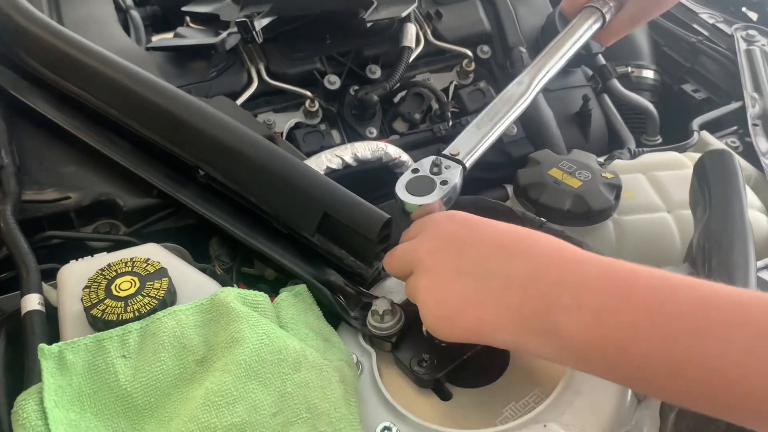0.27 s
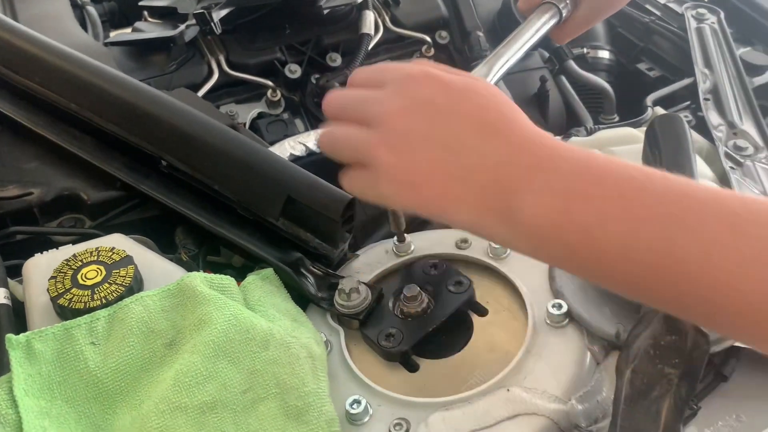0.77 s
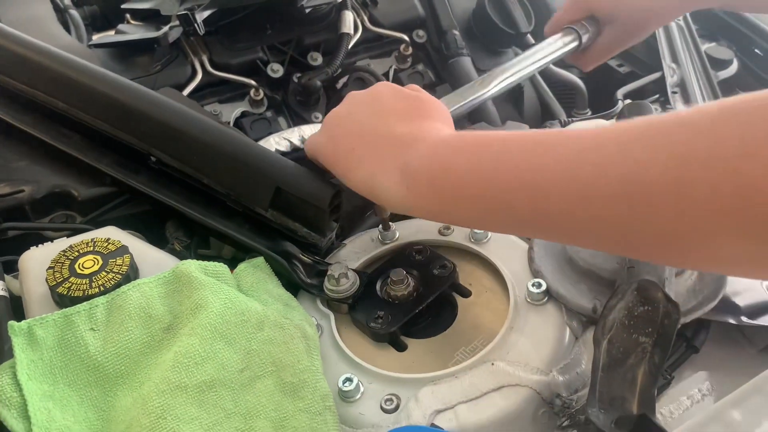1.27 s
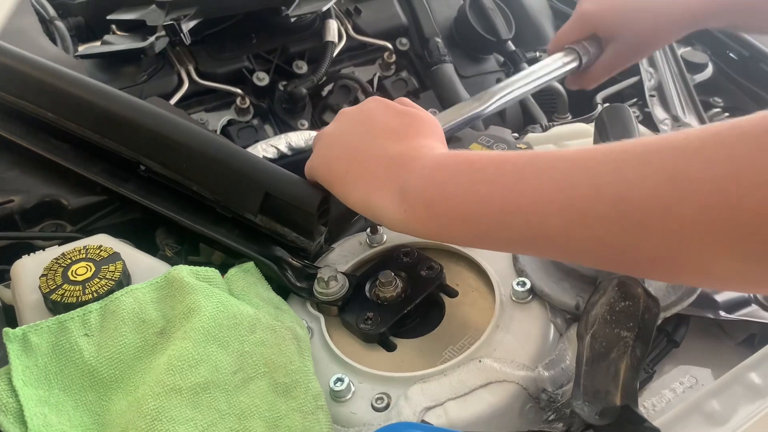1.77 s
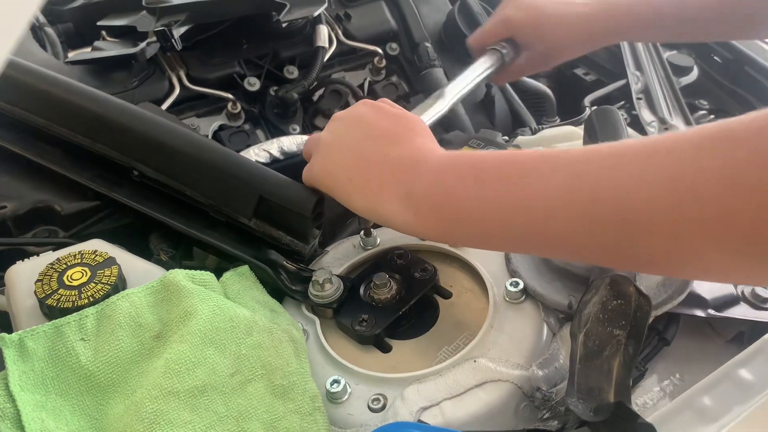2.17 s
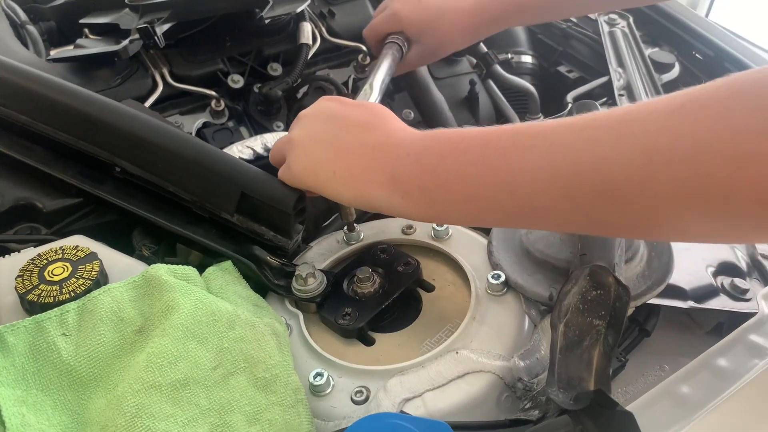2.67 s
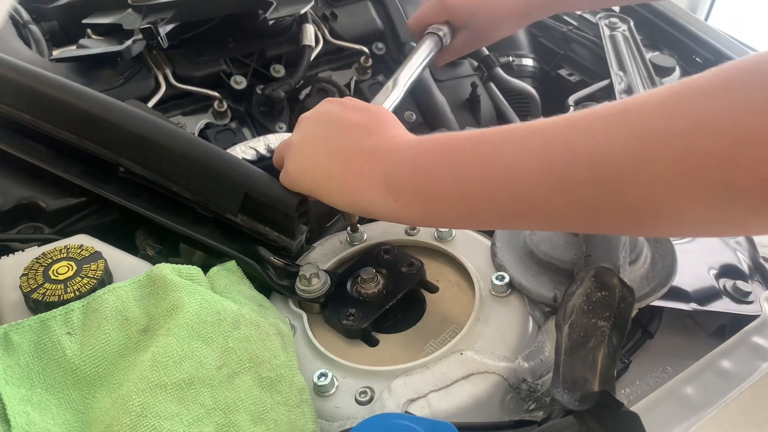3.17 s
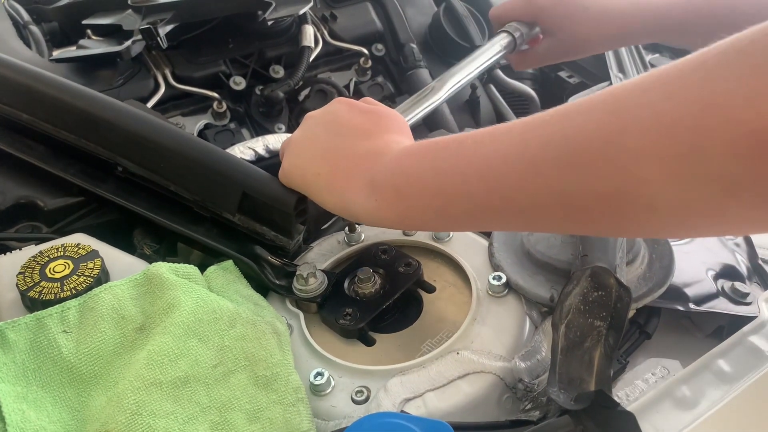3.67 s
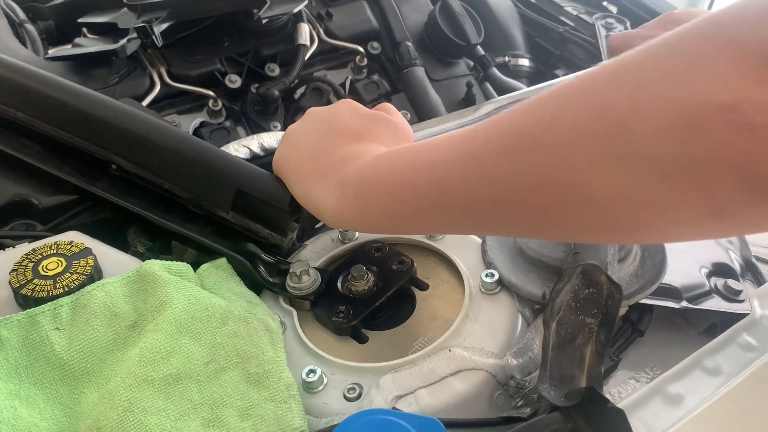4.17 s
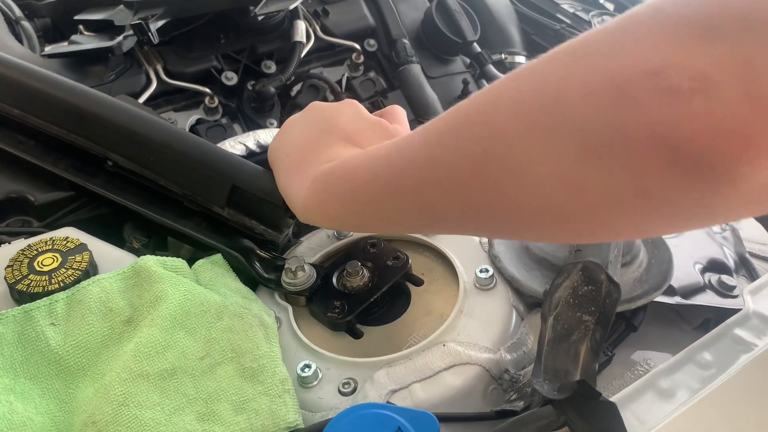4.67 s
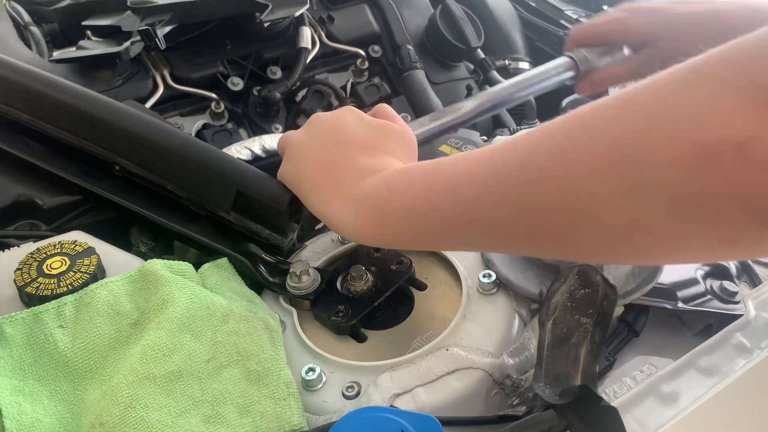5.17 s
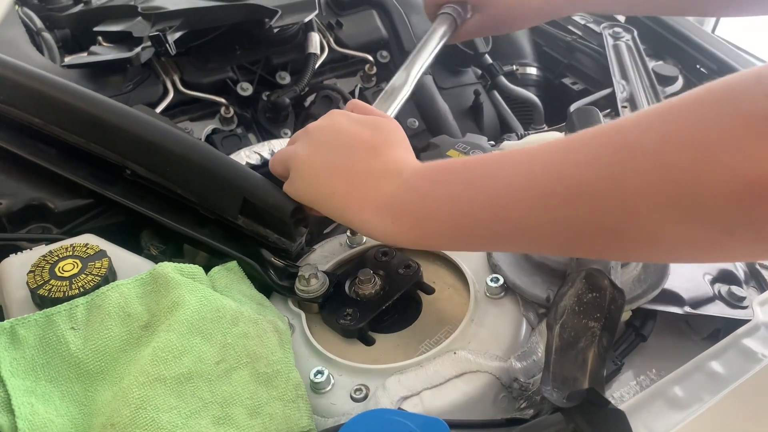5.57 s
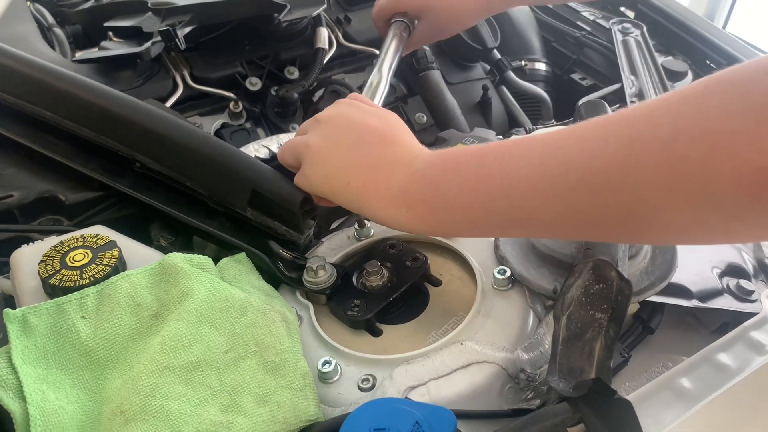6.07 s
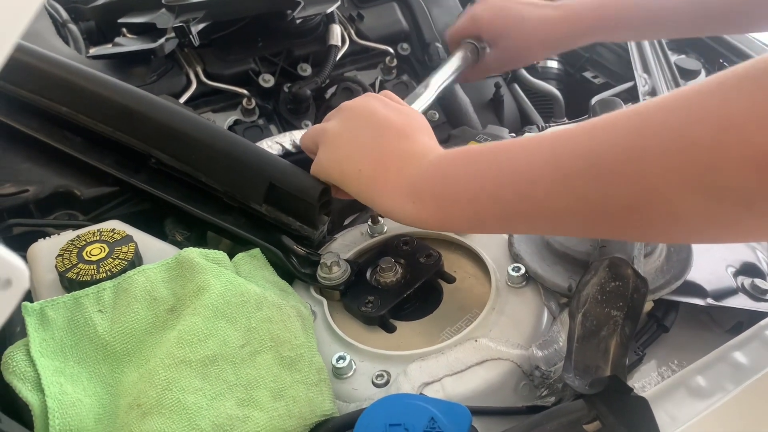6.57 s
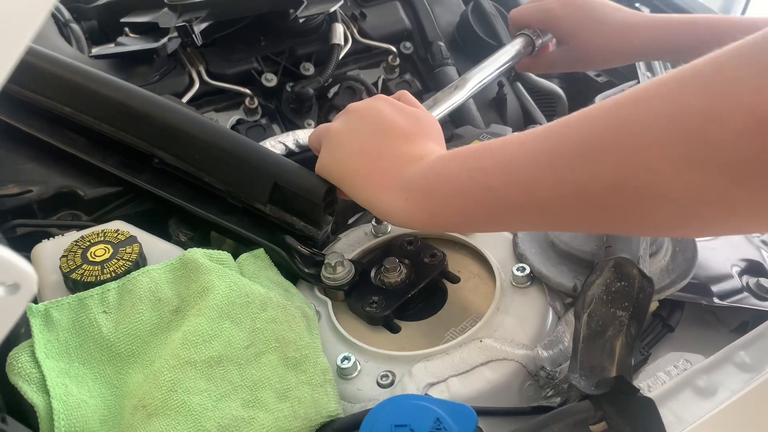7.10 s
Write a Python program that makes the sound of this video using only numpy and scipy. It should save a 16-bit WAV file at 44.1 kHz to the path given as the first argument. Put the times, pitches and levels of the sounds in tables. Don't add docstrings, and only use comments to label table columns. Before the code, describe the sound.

A ratcheting wrench tightens a nut within arm's reach of the microphone. A weaker click and hollow metal bumps open it, then small ticks and a clattering knock, two groups of hard bright snaps, a lull with soft low body creaks and a faint scrape, and another run of snaps with a slight steely ring. Short reflections come off the engine parts; low road wash stays quiet behind and thins near the end.

```python
import sys
import numpy as np
from scipy import signal
from scipy.fft import rfft, irfft
from scipy.io import wavfile

SR = 44100
rng = np.random.default_rng(int(sys.argv[2]) if len(sys.argv) > 2 else 0)


def gain_from_decibels(decibels):
    exponent = np.asarray(decibels, float) / 20
    return 10 ** exponent


def output_pcm(signal):
    pcm = np.clip(np.atleast_2d(signal).T, -1, 1) * 32767
    wavfile.write(sys.argv[1], SR, np.round(pcm).astype(np.int16))


N = 323463
EDGES_HZ = 22 * 2 ** np.arange(0, 9.6, .5)


def rms_one(x):
    return x / np.sqrt(np.mean(x ** 2) + 1e-20)


def peak_one(x):
    return x / np.abs(x).max()


def in_time(rows):
    s, *columns = np.transpose(rows)
    return [np.interp(np.arange(N) / SR, s, c) for c in columns]


def at_hz(points, hz, axis=1):
    points = np.array(points)
    return np.interp(np.log(hz), np.log(points[:, 0]), points[:, axis])


def band(x, low_hz, high_hz):
    edges = [low_hz, min(high_hz, SR * .45)]
    return signal.sosfilt(signal.butter(2, edges, "band", fs=SR, output="sos"), x)


def steep(x, hz, kind, order):
    return signal.sosfilt(signal.butter(order, hz, kind, fs=SR, output="sos"), x)


def drift(rate):
    r = np.exp(-80 * np.pi * rate / SR)
    noise = rng.standard_normal(N // 40 + 2002)
    slow = signal.lfilter([1], [1, -2 * r, r * r], noise)[2000:]
    return np.interp(np.arange(N) / 40, np.arange(len(slow)), rms_one(slow))


def ring(clicks, hz, t60):
    r, w = gain_from_decibels(-60 / (t60 * SR)), 2 * np.pi * hz / SR
    return signal.lfilter([0, np.sin(w)], [1, -2 * r * np.cos(w), r * r], clicks)


def dying(seconds, t60, rise):
    t = np.arange(round(seconds * SR)) / SR
    return (1 - np.exp(-t / rise)) * gain_from_decibels(-60 * t / t60)


def add(out, s, piece):
    i = round(s * SR)
    out[..., i:i + piece.shape[-1]] += piece[..., :N - i]


def strokes(rows):
    t, total = np.arange(N) / SR, 0
    for s, rise, hold, fall, db in rows:
        away = np.maximum((s - t) / rise, (t - s - hold) / fall)
        total = total + gain_from_decibels(db - 29.5 * np.clip(away, 0, 2))
    return total


# f/Hz, likeness [0-1]
LIKENESS = [(60, 0.94), (130, 0.99), (290, .7), (640, .3), (1400, 0.1), (3100, 0.038), (7000, 0.15)]


def pair(mid, side, hz):
    alike = np.clip(at_hz(LIKENESS, hz), 0, 1)
    return np.sqrt(1 + alike) * mid + np.sqrt(1 - alike) * side * [[1], [-1]]


# f/Hz, level/dB [per Hz]
OUTDOORS = [(25, -12), (50, -2), (74, -7.5), (110, -8), (240, -18.5), (420, -19.5), (700, -19.5),
            (1100, -22.5), (1740, -28), (2300, -40.5), (3000, -57), (6000, -60.5), (10000, -58),
            (14000, -61.5)]
# t/s, level/dB
TRAFFIC = [(0.0, -57.5), (0.24, -58), (0.65, -64.5), (1.37, -60), (1.59, -61), (1.98, -62), (2.78, -64.5),
           (3.86, -64.5), (3.94, -62), (4.33, -62), (4.57, -59), (5.08, -61), (6.25, -75.5), (6.76, -70),
           (7.02, -75), (7.33, -74.5)]
# t/s, level/dB
ENGINE = [(0, -55), (.9, -56), (2.0, -55.5), (3.0, -62), (3.9, -57), (4.3, -51.5), (4.47, -56),
          (4.65, -52.5), (5.37, -45.5), (5.65, -57.5), (5.85, -55.5), (6.08, -47), (6.24, -65),
          (6.66, -48.5), (6.76, -58.5), (6.9, -54.5), (7.06, -68), (7.33, -63.5)]
# t/s, level/dB
LORRY = [(0, -66.5), (.7, -60.5), (1.3, -58), (2.1, -60.5), (3.0, -58), (4.0, -63.5), (5.0, -67),
         (6.3, -62), (7.33, -72.5)]


def road():
    (near_db,), (engine_db,), (rumble_db,) = in_time(TRAFFIC), in_time(ENGINE), in_time(LORRY)
    near_db = near_db - near_db.mean()
    drone_db = -60 + .8 * near_db + 1.5 * drift(2.7)
    wash_db = -66.5 + 0.96 * near_db
    white, ranges, together = rng.standard_normal((2, 2, N)), np.zeros((4, 2, N)), drift(4.5)
    for k, (low, high) in enumerate(zip(EDGES_HZ, EDGES_HZ[1:])):
        mid, side = band(white[k % 2], low, high)
        hz = np.sqrt(low * high)
        patchy_db = .8 if hz < 2500 else .2
        gain = gain_from_decibels(at_hz(OUTDOORS, hz) + patchy_db * (together + drift(1.6)))
        ranges[np.searchsorted([90, 300, 2600], hz)] += gain * pair(mid, side, hz)
    ranges[0] = steep(ranges[0], 36, "high", order=4)
    ranges[3] = steep(ranges[3], 14300, "low", order=16)
    levels_db = rumble_db + 4.0, drone_db, wash_db, -82.25
    stream = sum(gain_from_decibels(db) * rms_one(r) for db, r in zip(levels_db, ranges))

    tyre_hz, tyre_t60_s = 1065, .022
    tyres = pair(*ring(rng.standard_normal((2, N)), tyre_hz, tyre_t60_s), tyre_hz)
    far = gain_from_decibels(-69 + .3 * near_db + 2.1 * drift(5.3)) * rms_one(tyres)
    steady = steep(ranges[2, ::-1, ::-1], 680, "high", order=2)
    far += gain_from_decibels(-73) * rms_one(steady)

    engine_hz = 74.45
    beat = np.sin(2 * np.pi * np.cumsum(engine_hz + 1.583 * drift(1.2)) / SR)
    hum = ring(rng.standard_normal((2, N)), engine_hz, 0.3)
    hum = rms_one(hum[0] + 0.3 * hum[1] * [[1], [-1]])
    hum = rms_one(1.4 * beat + hum)
    return stream + gain_from_decibels(engine_db - 1.5) * hum + far


# t/s, peak level/dB, weight under 2.8 kHz/dB, body 2.8-5.5 kHz/dB, brightness over 9 kHz/dB
PAWL = [(0.119, -33, -16, -11, -11.5), (2.1748, -27, -23.5, -11, -4), (2.1826, -19, -18.5, -18.5, -7.5),
        (2.4824, -31.5, -17.5, -21, -8.5), (2.5098, -18.5, -6, -18.5, -3.5), (5.1825, -50, -19.5, -26, 0),
        (5.3406, -28.5, -10, -15.5, -3.5), (5.3479, -18.5, -8.5, -14.5, -3), (5.5553, -29, -12, -4.5, 0),
        (5.57, -20.5, -11.5, -18.5, -4.5), (5.8679, -32.5, -7, -12, -1.5),
        (5.9001, -22.5, -12.5, -19, -9.5)]
# f/Hz, level/dB, t60/s
WRENCH = [(2000, -13, 0.017), (2888, -6, 0.065), (3600, -5.5, 0.076), (3673, -3, .09), (3860, -6, .08),
          (4140, -10, 0.045), (4690, -8.5, 0.063), (5110, -11, 0.083), (5820, -3.5, 0.043),
          (6000, -5.5, 0.071), (6160, -8, 0.096), (6625, -2.5, 0.082), (7370, -14.5, 0.076),
          (7560, -6.5, 0.074), (8350, -0.5, 0.12), (8600, -2.5, 0.1), (9060, -4.5, 0.032),
          (11100, -12, 0.02), (12730, -5, .05), (13470, -2, 0.039), (13860, -13.5, 0.023)]
# f/Hz, level/dB [per Hz]
CRACK = [(700, -35.5), (1100, -9), (1700, -7.5), (2400, -4.5), (3500, -1.5), (5000, 4), (6400, 1),
         (8700, -1.5), (12500, 3), (16400, -1.5)]
# f/Hz, level/dB
SHADE = [(300, -1.5), (1500, -3), (4000, 3), (4800, -4.5), (6500, -12.5), (7600, -20), (9000, 5.5)]


def pawl():
    out, feed = np.zeros((2, N)), np.zeros(N)
    length = 4400
    snap = dying(length / SR, .010, .00015)
    blow = np.eye(1, length)[0]
    for s, db, weight_db, body_db, bright_db in PAWL:
        colour = [(1300, weight_db + 14.5), (2300, weight_db + 13.5), (4200, body_db + 13.0),
                  (6800, 0), (10500, bright_db + 9.5), (13500, 1.7 * bright_db + 11)]
        chatter = rng.standard_normal((3, length)) * gain_from_decibels(2 * rng.standard_normal(length))
        rattle_db = np.interp(db, [-32, -22], [-10, -12])
        hit, sent = np.zeros((2, length)), np.zeros(length)
        for k, (low, high) in enumerate(zip(EDGES_HZ[10:], EDGES_HZ[11:])):
            hz = np.sqrt(low * high)
            own = np.interp(np.log2(hz / 5000), [-1.4, -.4, 1.1], [.6, 1.6, 1.2])
            sides = (chatter[0] + own * chatter[1:]) / np.hypot(1, own)
            sides = sides * gain_from_decibels(at_hz(SHADE, hz) / 2 * np.array([[1], [-1]]))
            rattle = gain_from_decibels(rattle_db) * dying(length / SR, .06 * min(1, (7000 / hz) ** .6), .001)
            click = 2.0 * np.roll(blow, 12) * [[(-1) ** (k // 2)], [1]]
            gain = (-1) ** k * gain_from_decibels(at_hz(CRACK, hz) + at_hz(colour, hz))
            hit += gain * band(sides * (snap + rattle) + click, low, high)
            sent += gain * band(blow, low, high)
        rings = np.zeros((2, length))
        for hz, mode_db, t60 in WRENCH:
            own_db = rng.normal(0, 1.6, (2, 1))
            rings += gain_from_decibels(mode_db + at_hz(colour, hz) + own_db) * ring(blow, hz, t60)
        hit = gain_from_decibels(db + 8.5) * peak_one(peak_one(hit) + gain_from_decibels(-8.0) * peak_one(rings))
        add(out, s, hit)
        echo_db = 1.5 + 0.17 * bright_db
        add(feed, s, gain_from_decibels(echo_db) * (rms_one(sent) + 0.41 * rms_one(rings[0])) * hit.std())
    return out, steep(feed, 14600, "low", order=16)


# f/Hz, t60/s, level/dB
BAY = [(300, 0.11, 2.5), (1010, 0.12, 6.5), (2503, 0.27, -2.5), (5000, 0.3, -1), (9000, 0.26, -6.5),
       (14000, 0.12, -12)]


def bay(x):
    white, echoes = rng.standard_normal((2, 2, 22000)), 0
    for k, (low, high) in enumerate(zip(EDGES_HZ[4:], EDGES_HZ[5:])):
        hz = np.sqrt(low * high)
        fall = dying(22000 / SR, at_hz(BAY, hz), 0.0014)
        echoes = echoes + gain_from_decibels(at_hz(BAY, hz, axis=2)) * pair(*band(white[k % 2], low, high), hz) * fall
    echoes = echoes / np.sqrt(np.sum(echoes ** 2) / 2)
    return signal.fftconvolve(x[None], echoes, axes=1)[:, :N]


# t/s, panel level/dB, crack level/dB, push length/s, most moved part f/Hz
KNOCKS = [(0.124, -32.5, -59, 0.018, 190), (0.131, -34, -72, 0.0075, 620), (0.164, -41.5, -71, 0.032, 620),
          (0.296, -36.5, -45.5, 0.028, 190), (0.284, -39, -51, 0.011, 596), (0.306, -36, -39, 0.011, 1260),
          (0.314, -30.5, -46, 0.01, 587), (1.326, -40, -34.5, 0.017, 900), (1.345, -31.5, -34, 0.0093, 596),
          (1.356, -33, -70, 0.047, 175), (1.819, -43.5, -54.5, 0.017, 390), (2.76, -48.5, -79, 0.023, 200),
          (5.357, -42.5, -59, 0.026, 340), (5.57, -46.5, -66, 0.035, 550), (5.902, -44, -46, 0.041, 400),
          (6.590, -42.5, -42.5, 0.0076, 260), (6.601, -45.5, -76.5, 0.022, 390)]
# f/Hz, level/dB, t60/s
PANEL = [(144, -14.5, 0.29), (196.5, 0, 0.15), (247, -7.5, 0.13), (280, -10, 0.1), (390, -9, 0.17),
         (471, -16.5, 0.17), (555, -8, 0.06), (596.4, -0.5, 0.036), (750, -8.5, .07), (841, -9, 0.025),
         (1000, -11.5, 0.1), (1350, -11.5, 0.099), (1570, -25.5, 0.15), (1750, -39.5, 0.02),
         (2390, -12, 0.066), (2620, -22.5, .03), (3090, -22, .03)]


def tower():
    out, length_s, crack_hz = np.zeros(N), 17600 / SR, 1450
    for s, panel_db, crack_db, push, part_hz in KNOCKS:
        noise = rng.standard_normal((2, 17600))
        shove = noise[0] * dying(length_s, 4 * push, push / 3)
        boom = 0
        for hz, db, t60 in PANEL:
            reach_db = -8 * abs(np.log2(hz / part_hz))
            boom = boom + gain_from_decibels(db + rng.normal(0, 1.5) + reach_db) * ring(shove, hz, t60)
        dull = noise[1] * dying(length_s, 5.3 * push, 0.00023)
        bright = noise[1] * dying(length_s, 0.97 * push, 0.00028)
        crack = band(dull, crack_hz / 2, crack_hz * 1.27)
        crack += gain_from_decibels(-17.0) * band(bright, crack_hz * 0.81, 9700)
        add(out, s, gain_from_decibels(panel_db) * peak_one(boom) + gain_from_decibels(crack_db) * peak_one(crack))
    return out


# t/s, peak level/dB, f/Hz,
# width/octaves
TICKS = [(.27, -58, 2600, 0.34), (0.308, -36, 3080, 2.4), (0.412, -49, 2300, 1.3), (.41, -57, 4860, 0.57),
         (0.412, -49, 9000, 1.1), (.671, -51.5, 5170, 1.45), (.95, -57, 4400, 1.9), (1.026, -59, 7350, 1.2),
         (1.075, -62, 3500, 0.38), (1.319, -49.5, 2280, 1.7), (1.327, -32, 2760, 0.63),
         (1.342, -41, 3670, 1.2), (1.545, -65, 4600, 0.78), (1.556, -60.5, 3980, 0.58),
         (1.765, -63, 2560, 0.36), (2.059, -63, 6000, 0.57), (4.55, -63, 4040, 0.46),
         (4.606, -49, 1750, 0.65), (5.116, -41, 1350, .8), (5.129, -62, 3600, 0.36),
         (5.131, -59, 7180, 0.5), (2.481, -29, 6750, .3), (5.867, -32.5, 6370, .25),
         (5.903, -33, 6400, .35), (5.57, -19, 13500, .2), (5.9007, -23.5, 13500, .2), (6.11, -65, 7540, .5),
         (6.131, -62.5, 7830, 0.33), (6.588, -54, 3600, 0.95), (7.274, -70, 4180, 0.69)]


def ticks():
    out = np.zeros(N)
    for s, db, hz, octaves in TICKS:
        touch = rng.standard_normal(2200) * dying(2200 / SR, 0.021, 0.00075)
        touch[3] += 6
        low, high = hz / 2 ** (octaves / 2), hz * 2 ** (octaves / 2)
        add(out, s, gain_from_decibels(db) * peak_one(band(band(touch, low, high), low, high)))
    return out


# full weight t/s, build-up/s, hold/s, let-go/s, level/dB
LEANS = [
    (4.4, 0.38, 0.64, 0.48, -61.5),
    (0.83, 0.26, 0.14, 0.11, -65),
    (2.4, 0.13, 0.085, 0.15, -61.5),
    (6.42, .1, 0.053, 0.084, -66.5),
]


def lean():
    nudges = (rng.random(N) < 170 / SR) * rng.standard_normal(N)
    dealt = rng.integers(0, 5, N)
    mutter = 0
    for k, (hz, db, t60) in enumerate(PANEL[1:6]):
        own = nudges * (dealt == k) + 1e-18
        mutter = mutter + gain_from_decibels(.5 * db) * ring(own, hz, .4 * t60)
    return strokes(LEANS) * rms_one(steep(mutter, 400, "low", order=2))


# full strength t/s, build-up/s, hold/s, let-go/s, level/dB
DRAGS = [
    (2.172, 0.13, .002, .01, -64),
    (2.478, .04, 0.0016, .01, -70),
    (5.336, 0.055, .002, .01, -71.5),
    (5.552, 0.031, 0.0024, 0.013, -73),
    (5.865, 0.027, .002, .01, -72.5),
]
# full strength t/s, build-up/s, hold/s, let-go/s, level/dB
RUBS = [
    (4.5, .05, .05, 0.034, -84.5),
    (4.877, .06, .2, .07, -79.5),
]
# f/Hz, width/Hz, level/dB
RUB_RINGS = [(2230, 290, -8), (3600, 300, 0.5), (4870, 190, 7.5), (6984, 300, -11)]


def rub():
    grit = rng.standard_normal(N) * gain_from_decibels(2.28 * drift(40))
    drag = strokes(DRAGS) * rms_one(band(grit, 4200, 8200))
    rings = sum(gain_from_decibels(db) * rms_one(ring(grit, hz, 2.0 / width)) for hz, width, db in RUB_RINGS)
    scrape = 1.5 * rms_one(rings) + rms_one(band(grit, 3300, 8000))
    return strokes(RUBS) * rms_one(scrape) + drag


# f/Hz, level/dB, t60/s
HANDLE = [(3550, -3.5, 0.32), (3670, -7, 0.28), (5090, -0.5, 0.34), (5150, -3, 0.31), (6316, -0.5, .25)]
# t/s, level/dB
LOOSE_GRIP = [
    (5.348, -56.5),
    (5.555, -55),
    (5.571, -54),
]


def handle():
    s, db = np.transpose(LOOSE_GRIP)
    out = np.zeros(N)
    for hz, mode_db, t60 in HANDLE:
        clicks = np.full(N, 1e-18)
        clicks[(s * SR).astype(int)] = gain_from_decibels(db + mode_db + rng.normal(0, 1.6, len(s)))
        out += ring(clicks, hz, t60) * gain_from_decibels(3.6 * drift(40))
    return out


def scene():
    far = road()
    clicks, feed = pawl()
    small = tower() + ticks() + lean() + rub() + handle()
    near = clicks + small * gain_from_decibels([[.4], [-.4]])
    return near + gain_from_decibels(-9.5) * bay(feed) + gain_from_decibels(-7.5) * bay(small) + far


def low_pass(x):
    return signal.sosfilt(signal.butter(12, 16640, fs=SR, output="sos"), x)


def record(dry):
    split_hz, lag_samples = 8300, 13
    hz = np.fft.rfftfreq(N, 1 / SR)
    shared = 1 / (1 + (split_hz / (hz + 1)) ** 24)
    left, right = rfft(dry)
    late = right * np.exp(-2j * np.pi * hz * lag_samples / SR)
    left = np.sqrt(1 - shared) * left + np.sqrt(shared) * late
    ports = steep(irfft(np.array([left, right]), N), 15850, "low", order=24)
    return low_pass(ports)


dry = scene()
out = record(dry)
output_pcm(out)
```